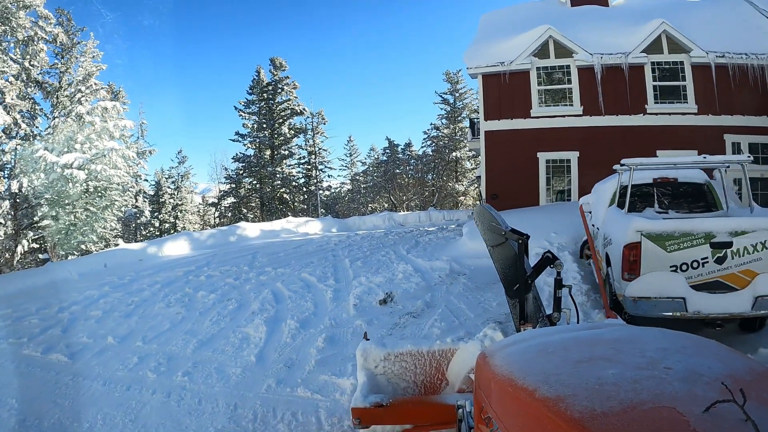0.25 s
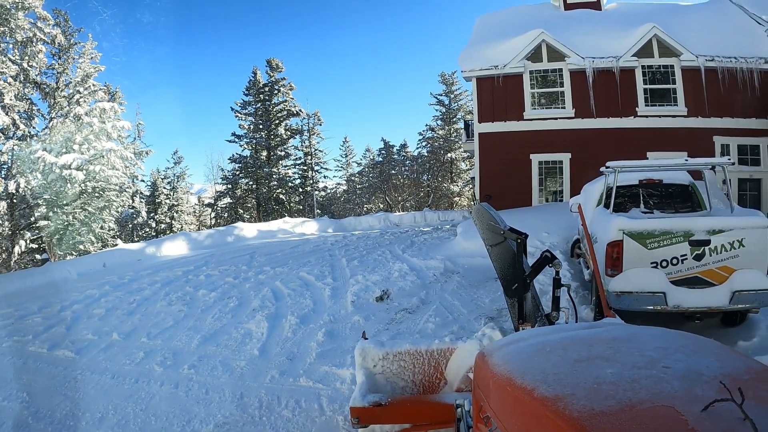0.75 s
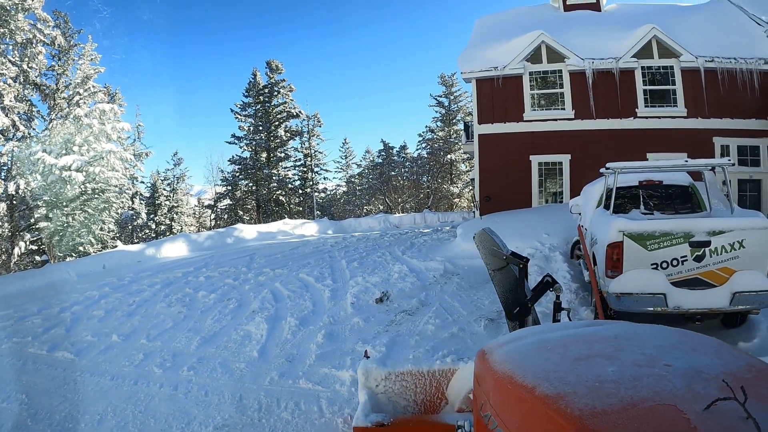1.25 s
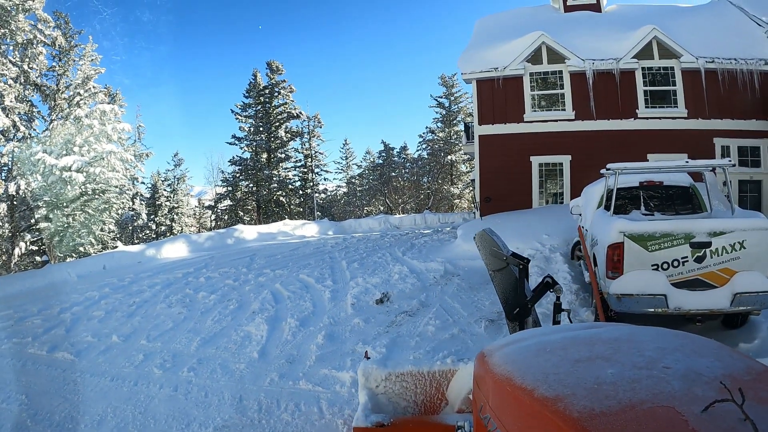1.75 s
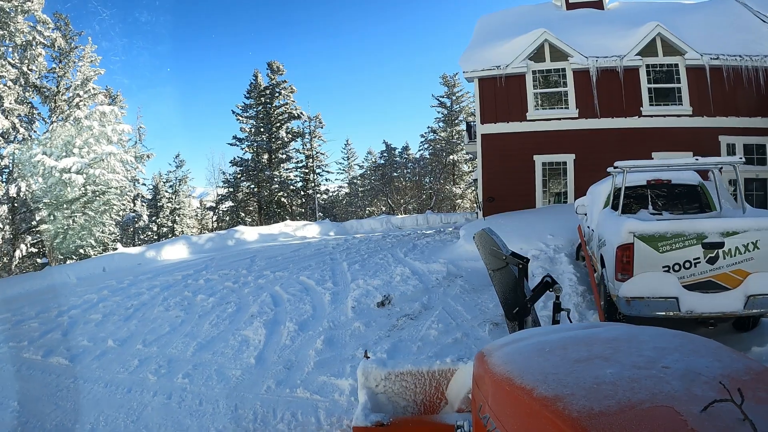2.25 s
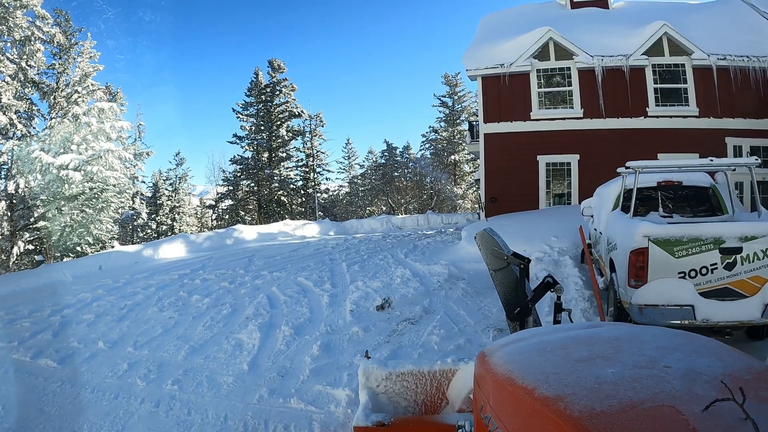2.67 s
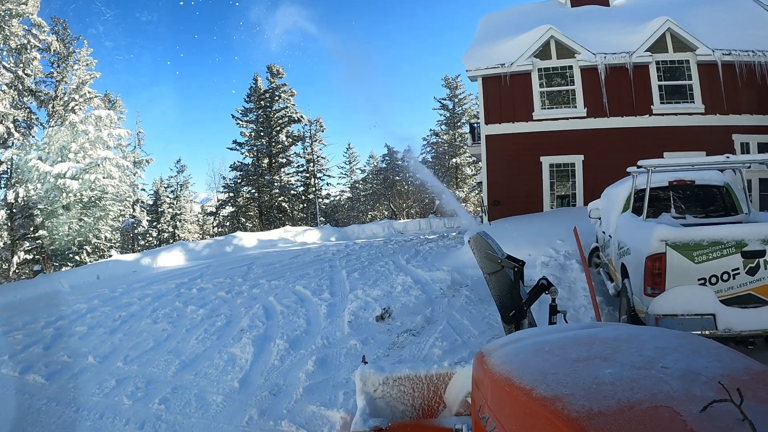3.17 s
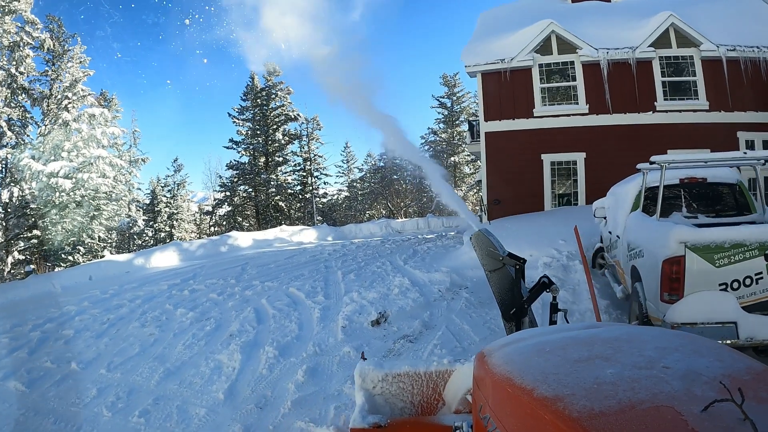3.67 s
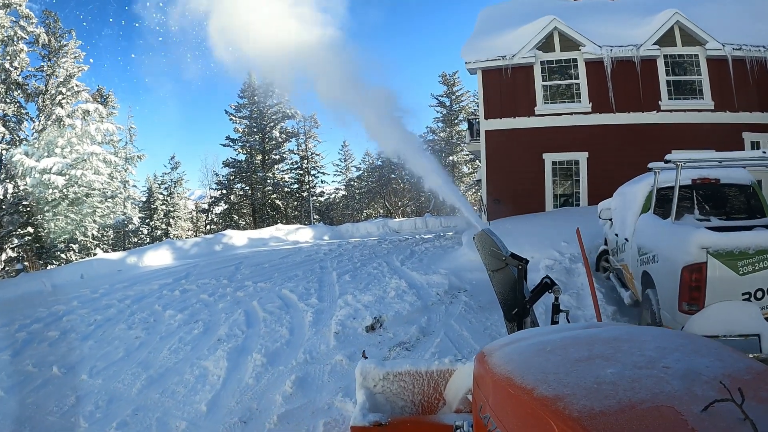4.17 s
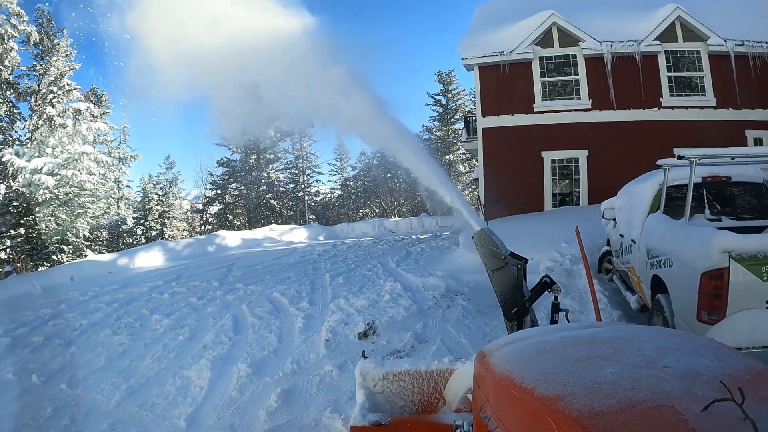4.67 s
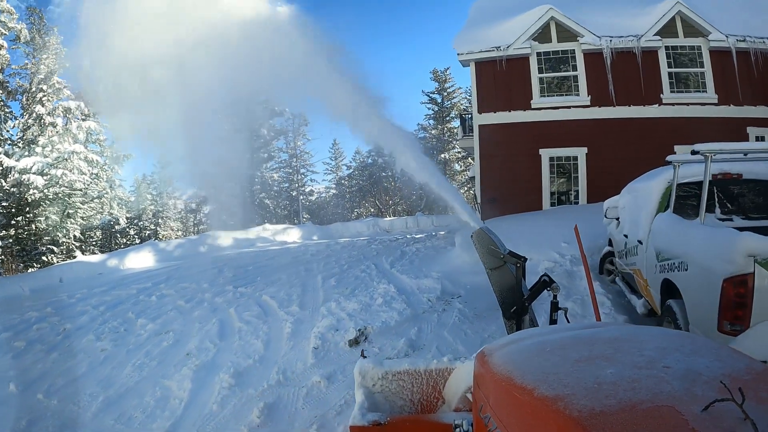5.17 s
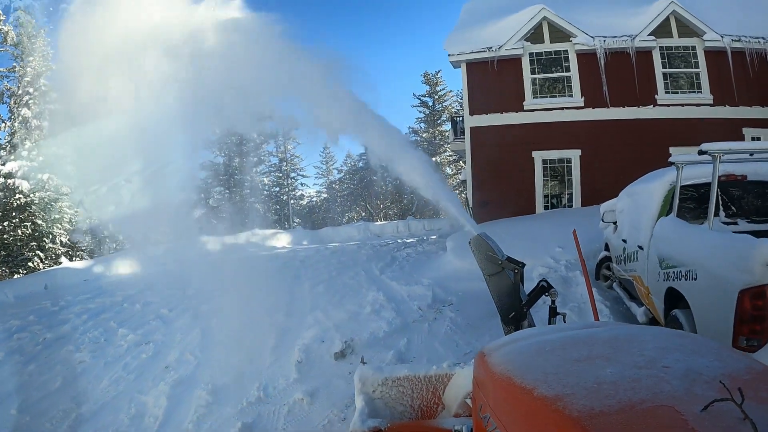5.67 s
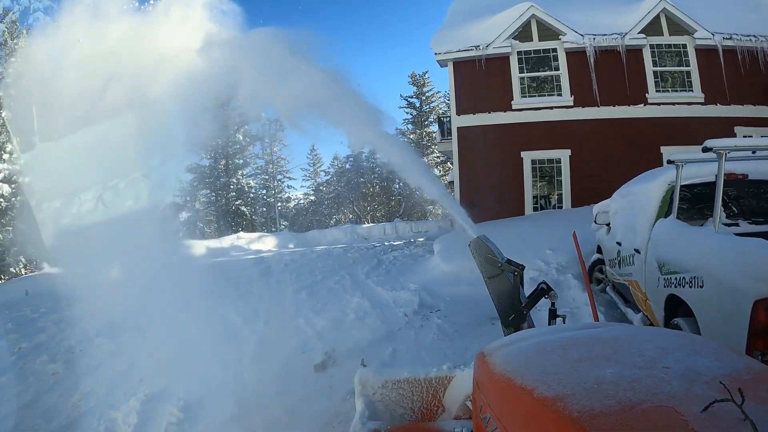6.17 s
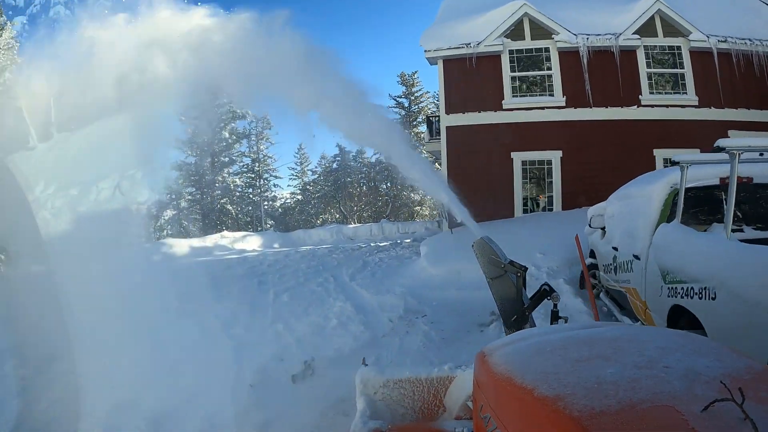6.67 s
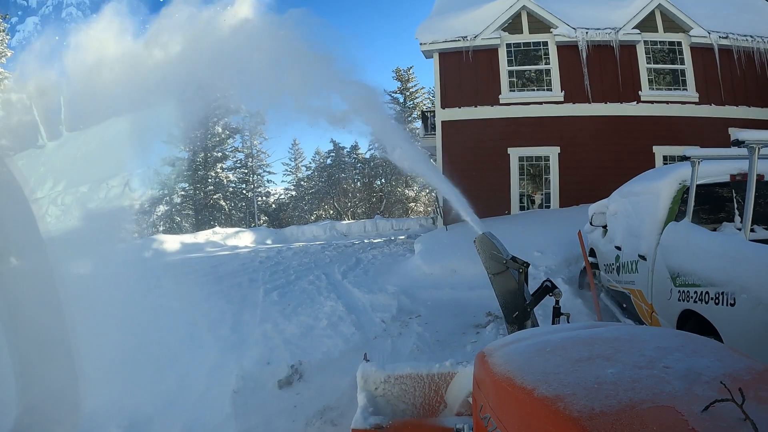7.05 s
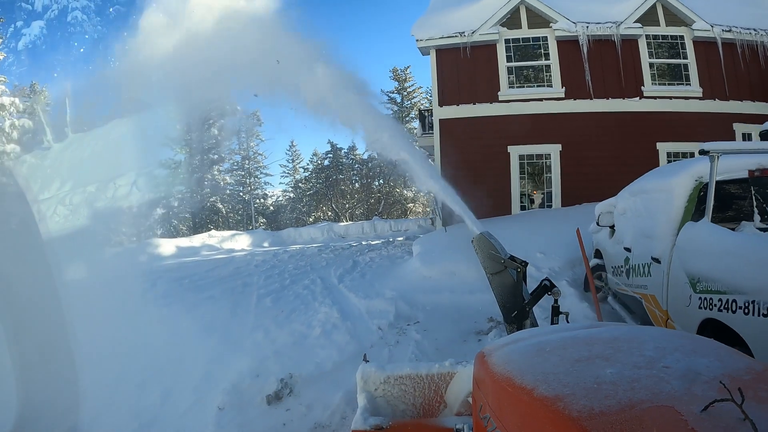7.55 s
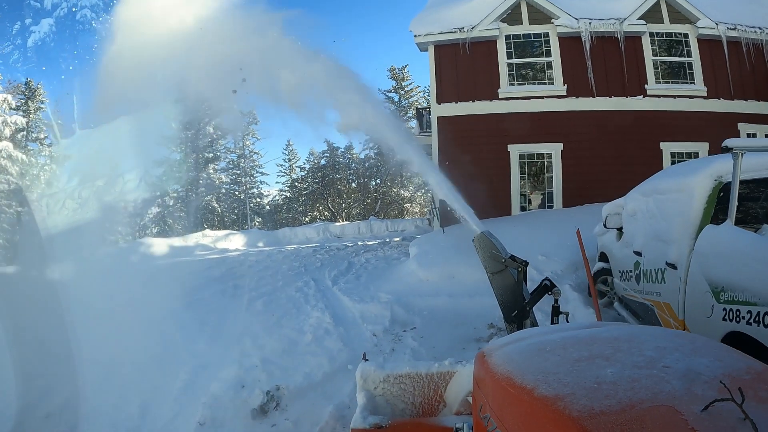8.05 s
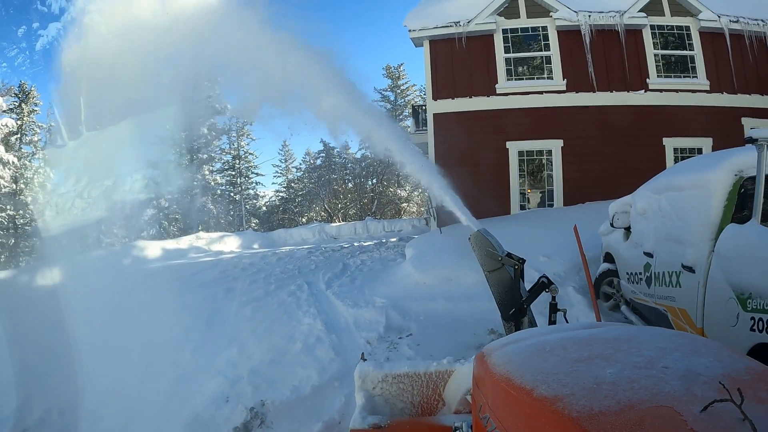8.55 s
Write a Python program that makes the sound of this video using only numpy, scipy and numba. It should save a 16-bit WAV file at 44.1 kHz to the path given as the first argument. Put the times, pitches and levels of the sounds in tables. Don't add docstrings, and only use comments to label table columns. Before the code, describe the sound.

A three-cylinder diesel tractor is heard from inside its closed cab as it works a snow blower. Throughout, a dense low roar booms around the cab, with rapid firing pulses, soft injector clatter, a steady mid-pitched gear whine and hydraulic singing. Deep frame shudder swells and fades in spells. Close lever clacks strike at about 0.35 and 0.5 seconds, with a fainter one near 0.9. From 1.25 to 1.5 a rattling cluster of clacks and hollow knocks mixes with dry, chirpy squeaks; the level dips briefly and recovers. Engine speed sags slightly toward 2.7, and the roar thickens around 3. A faint tick comes at 4.2. At 5.25 a heavy low thump lands with a clack, short squeak and tiny high ticks until 5.4. The engine then runs on, slightly fuller near 6.8, with a barely audible squeak at 8.5, and does not stop before the end at 8.8.

```python
import sys
import numpy as np
from scipy import signal
from scipy.fft import rfft, irfft, next_fast_len
from scipy.io import wavfile
from scipy.ndimage import uniform_filter1d
from numba import njit

SR = 44100
rng = np.random.default_rng(int(sys.argv[2]) if len(sys.argv) > 2 else 0)


def bounce(signal):
    frames = np.transpose(np.atleast_2d(signal))
    limited = np.clip(frames, -1, 1)
    pcm = np.round(limited * 32767).astype(np.int16)
    wavfile.write(sys.argv[1], SR, pcm)


def decibels_to_gain(level_db):
    exponent = np.asarray(level_db, float) / 20
    return 10 ** exponent


N = 388521


def level(x, db):
    return x * decibels_to_gain(db) / np.sqrt(np.mean(x ** 2))


def curves(table):
    time_s, *columns = np.transpose(table)
    return [np.interp(np.arange(N) / SR, time_s, column) for column in columns]


def at(table, hz):
    table_hz, value = np.transpose(table)
    return np.interp(np.log(np.maximum(hz, 1)), np.log(table_hz), value)


def peak(f, centre_hz, width_hz):
    return 1 / np.sqrt(1 + ((f - centre_hz ** 2 / np.maximum(f, 1)) / width_hz) ** 2)


def walk(rate_hz):
    hold = int(SR / rate_hz)
    steps = np.repeat(rng.standard_normal(N // hold + 1), hold)
    return 1.02 * uniform_filter1d(uniform_filter1d(steps, hold), hold)[:N]


# freq_hz, likeness [0-1]
LIKENESS = [(60, 0.97), (180, 1), (300, 0.95), (520, 0.85), (890, 0.62), (1520, 0.87), (2600, 0.03),
            (4000, 0.47), (8000, 0.64), (12000, 0.5)]
# freq_hz, left_minus_right_db
LEAN = [(30, -0.4), (140, -1), (320, 1), (740, 2.5), (1130, 4), (1710, 3), (2600, 1), (4000, -1.5),
        (8000, 3.5), (12000, 4)]


def noise(gain, gate=1):
    size = next_fast_len(N)
    f = np.arange(size // 2 + 1) * SR / size
    mid, side = rfft(gate * rng.standard_normal((2, N)), size)
    likeness = np.sqrt(np.clip(at(LIKENESS, f), 0, 1))
    mid = mid * np.sqrt(1 + likeness)
    side = side * np.sqrt(1 - likeness)
    lean = decibels_to_gain(at(LEAN, f) / 2)
    ports = np.array([(mid + side) * lean, (mid - side) / lean])
    return level(irfft(gain(f) * ports, size)[:, :N], 0)


def tone(hz, db, wander_db=1.7):
    lean_db = at(LEAN, np.mean(hz)) / 2
    apart = min(np.mean(hz) / 2500, 1)
    port_wander_db = apart * 1.3 * np.array([walk(2.9), walk(3.3)])
    ports = decibels_to_gain(lean_db * np.array([[1], [-1]]) + port_wander_db)
    phase = 2 * np.pi * (np.cumsum(hz * (1 + .0004 * walk(9))) / SR + rng.random())
    return np.sqrt(2) * decibels_to_gain(db + wander_db * walk(7)) * ports * np.sin(phase)


# start_s, length_s, pitch_hz, level_db
SHUDDER = [(-.1, 1.4, 27.53, -21.5), (1.222, 0.41, 24.63, -15.5), (1.804, 0.87, 26.31, -18.5),
           (2.85, 0.88, 25.68, -23.5), (3.853, 0.52, 27.5, -17), (4.501, 0.9, 26.3, -15),
           (5.45, 0.32, 26.1, -22.5), (6.002, 0.41, 26.16, -22.5), (6.902, 0.8, 26.2, -19.5),
           (7.8, 0.7, 27.44, -18), (8.657, .4, 27.3, -20.5)]
SHUDDER_FADE_S, SHUDDER_REST_DB, ROCK_DB, RUMBLE_DB = 0.13, -33, -24.5, -29.5


def frame():
    t = np.arange(N) / SR
    start_s, length_s, pitch_hz, level_db = np.transpose(SHUDDER)
    end_s = start_s + length_s
    inside_s = np.minimum(t - start_s[:, None], end_s[:, None] - t)
    swell = np.clip(inside_s / SHUDDER_FADE_S + .5, 0, 1)
    size = decibels_to_gain(SHUDDER_REST_DB) + decibels_to_gain(level_db) @ swell
    hz = uniform_filter1d(pitch_hz[np.searchsorted(start_s, t) - 1], size=SR // 8)
    rocking = decibels_to_gain(ROCK_DB) * noise(lambda f: peak(f, 22.5, 8.1) ** 2)
    rumble = decibels_to_gain(RUMBLE_DB) * noise(lambda f: peak(f, 40, 16) ** 2)
    return size * tone(hz, -2.3, wander_db=2.5) + rocking + rumble


# time_s, gear_mesh_hz
SPEED = [(0, 931), (1.9, 924), (2.7, 916.5), (3.2, 921), (3.6, 919), (4.8, 919), (5.6, 925), (5.9, 919.3),
         (6.8, 918.2), (7.6, 921), (8.81, 923)]
# time_s, effort_db
PUMP = [(0, -57), (.8, -53.5), (3, -51.5), (5.5, -55.5), (6, -50.5), (6.8, -49.5), (7.6, -51),
        (8.81, -51.5)]
PUMP_ORDERS = [3, 6, 9, 10, 11, 12]
PUMP_DB = [4.5, 4.5, 1.5, -3.5, -9.5, -13]
PUMP_PER_MESH = .282


def pump():
    pump_hz = curves(SPEED)[0] * PUMP_PER_MESH
    effort_db = curves(PUMP)[0]
    return sum(tone(k * pump_hz, effort_db + db) for k, db in zip(PUMP_ORDERS, PUMP_DB))


# start_s, length_s, pitch_hz, level_db
SQUEAKS = [(.43, .03, 7900, -58), (.98, .12, 7400, -59), (1.125, .09, 7300, -59), (1.255, .03, 2650, -34),
           (1.272, .045, 7800, -45), (1.275, .03, 5350, -44), (1.283, .035, 8150, -49),
           (1.30, .04, 6000, -46), (1.333, .09, 7800, -43), (1.345, .05, 5900, -49),
           (1.345, .045, 5300, -44), (1.35, .05, 8500, -52), (1.40, .03, 6000, -50),
           (5.205, .025, 14700, -51), (5.247, .04, 1920, -34), (5.285, .045, 14200, -57),
           (5.392, .03, 14150, -50), (8.465, .02, 7850, -60), (8.51, .04, 7800, -59)]


def squeaks():
    out = np.zeros((2, N + SR))
    t = np.arange(SR // 4) / SR
    for start_s, length_s, pitch_hz, level_db in SQUEAKS:
        swell = np.sin(np.pi * np.clip(t / length_s, 0, 1)) ** .7
        slip = uniform_filter1d(rng.standard_normal(len(t)), size=150)
        phase = 2 * np.pi * pitch_hz * np.cumsum(1 + .08 * slip) / SR
        i = int(start_s * SR)
        out[:, i:i + len(t)] += decibels_to_gain(level_db) * swell * np.sin(phase)
    return out[:, :N]


# start_s, level_db (rms at the blow), centre_hz, t60_s
CLACKS = [(.348, -23.5, 2530, .13), (.350, -23, 1090, 0.11), (.468, -33, 2720, 0.36), (.500, -20, 402, .12),
          (.501, -23, 2970, 0.16), (.926, -34, 3540, 0.13), (1.262, -28.5, 2620, 0.22),
          (1.305, -36, 2000, .18), (1.340, -26.5, 2100, .17), (1.385, -36, 2480, .23),
          (1.428, -36.5, 4490, 0.15), (5.204, -40, 7000, .1), (5.244, -26.5, 3100, 0.15),
          (5.246, -24, 1310, .16), (5.280, -50, 8800, .06), (5.300, -44, 8000, .06), (5.391, -35, 3500, .1),
          (6.168, -49, 4068, .06)]
# start_s, level_db, centre_hz, t60_s
KNOCKS = [(.352, -61, 10500, .1), (.510, -24, 1300, 0.11), (.926, -50, 9500, .088),
          (1.265, -51, 10530, .13), (1.272, -25.5, 1450, 0.25), (1.430, -56, 8500, .08),
          (1.385, -30, 1000, 0.26), (1.460, -22.5, 1000, 0.12), (5.256, -26.5, 1100, .12),
          (1.462, -27, 2020, .16), (5.228, -37, 6500, .05), (5.250, -14.5, 137, 0.49),
          (5.255, -15.5, 330, .22), (5.300, -19, 75, .28), (5.391, -38, 6800, 0.18),
          (5.391, -47, 12000, .12)]
# start_s, level_db, centre_hz, t60_s
TICKS = [
    (4.170, -48, 9450, .08),
    (5.205, -45, 14600, .15),
    (5.282, -58, 14500, .25),
    (5.372, -58, 14500, .12),
    (5.394, -45, 14400, .18),
]
# centre_hz, width_hz, level_db (over the plain burst)
LEVER = [(1094, 25, 9.5), (1600, 59, 5.5), (1930, 46, 0), (2210, 80, -1), (2750, 70, -12), (2740, 56, -2),
         (3720, 64, -20), (4870, 120, -9)]
CLACK_WIDTH, KNOCK_WIDTH, TICK_WIDTH = 1.2, 0.4, .1
BURST_TOP_HZ = 13400


def levers():
    out = np.zeros((2, N + SR))
    t = np.arange(SR // 4) / SR
    f = np.arange(len(t) // 2 + 1) * SR / len(t)
    ring = 1 + sum(decibels_to_gain(db + 1.0) * peak(f, hz, width_hz) ** 2 for hz, width_hz, db in LEVER)
    for blows, width in [(CLACKS, CLACK_WIDTH), (KNOCKS, KNOCK_WIDTH), (TICKS, TICK_WIDTH)]:
        for start_s, level_db, centre_hz, t60_s in blows:
            pan_db = .7 * at(LEAN, centre_hz)
            mid, side, chatter = rng.standard_normal((3, len(t)))
            audible = (f < BURST_TOP_HZ) | (centre_hz > BURST_TOP_HZ)
            colour = ring * peak(f, centre_hz, max(width * centre_hz, 40)) ** 3 * audible
            burst = irfft(rfft([mid + 0.32 * side, mid - 0.37 * side]) * colour, len(t))
            chatter = decibels_to_gain(21 * uniform_filter1d(chatter, size=130))
            decay = np.exp(-np.log(1000) * t / max(t60_s, .01))
            shape = np.minimum(t / .003, 1) * decay * chatter
            ports = decibels_to_gain(np.array([[pan_db], [-pan_db]]) / 2)
            i = int(start_s * SR)
            out[:, i:i + len(t)] += level(burst, level_db) * shape * ports
    return out[:, :N]


# freq_hz, density_db (per Hz)
ROAR = [(8.8, -24), (15, 6), (37, -9), (54, -7.5), (135, -9), (176, -11.5), (219, -8), (256, -27),
        (293, -9), (373, -15.5), (408, -12), (436, -14), (867, -20.5), (947, -16.5), (3000, -34),
        (3900, -72), (6600, -120)]
# freq_hz, density_db (per Hz)
CLATTER = [(1400, -12), (2000, -5.5), (3200, -8.5), (4300, -9.5), (5500, -15), (7700, -20), (8300, -25.5),
           (11400, -28), (11700, -30.5), (13300, -34), (14000, -45), (15800, -52)]
CYCLE_SAMPLES = 1947


def valves(turns, db):
    f = np.arange(CYCLE_SAMPLES // 2 + 1) * SR / CYCLE_SAMPLES
    colour = decibels_to_gain(at(ROAR, f) - 2.0) * (f > 420) + decibels_to_gain(at(CLATTER, f) - 28.0)
    impacts = rng.standard_normal((2, CYCLE_SAMPLES)) ** 3
    mid, side = irfft(rfft(impacts) * colour, CYCLE_SAMPLES)
    place = turns / 3 * CYCLE_SAMPLES
    grid = np.arange(CYCLE_SAMPLES)
    ports = [np.interp(place, grid, mid + lean * side, period=CYCLE_SAMPLES) for lean in (.45, -.25)]
    return level(np.array(ports), 0) * decibels_to_gain(db + 2.0 * walk(2.83))


# time_s, roar_db
LOAD = [(0, -29), (1.3, -27.5), (1.7, -29.5), (2.5, -28.5), (3.0, -27), (4.8, -27.5), (5.9, -27.5),
        (6.75, -26.5), (7.75, -27.5), (8.24, -27.5), (8.81, -28.5)]
FIRING_ORDERS = [2, 4, 4.25, 5, 6, 8, 9, 12, 18, 19, 20, 22, 24, 25.5, 30, 66, 78]
FIRING_DB = [-5.5, -10.5, -9, -19, -4.5, -11.5, -21.5, -30.5, -20.5, -21.5, -20, -21.5, -19.5, -23.5, -28.5,
             -43, -40]
# centre_hz, width_hz, level_db (over the roar)
CAB = [(63.2, 18, -7), (81.7, 14, -14.5), (106, 29, -2), (132, 24, -4), (161.6, 22, -6), (190.5, 6.9, -7.5),
       (310.8, 41, -7), (513, 96, -8.5), (701, 50, -16), (1050, 40, -19.5), (1390, 70, -17.5)]
MESH_PER_FIRING = 13.55
CLATTER_DB, GEAR_DB, BOOM_DB = -14.5, -11, 7.5
BOOM_HZ, BOOM_WIDTH_HZ, BOOM_PER_LOAD = 220.6, 29.9, 0.85


def diesel():
    mesh_hz, roar_db = curves(SPEED)[0], curves(LOAD)[0]
    firing_hz = mesh_hz / MESH_PER_FIRING
    lines = sum(tone(k * firing_hz, roar_db + db) for k, db in zip(FIRING_ORDERS, FIRING_DB))
    gears = tone(mesh_hz, roar_db + GEAR_DB, wander_db=1.5) + tone(mesh_hz / 2, roar_db - 10.5)
    turns = np.cumsum(firing_hz) / SR
    strength = decibels_to_gain(4.5 * rng.standard_normal(int(turns[-1]) + 1))
    knock = strength[turns.astype(int)] * np.exp(-(turns % 1) / 0.4)
    roar = decibels_to_gain(2.5) * noise(lambda f: decibels_to_gain(at(ROAR, f)), 1 + 0.15 * knock)
    panels = sum(decibels_to_gain(db + 1.1 * walk(6.7)) * noise(lambda f: peak(f, hz, width_hz) ** 2)
                 for hz, width_hz, db in CAB)
    boom_db = BOOM_DB + BOOM_PER_LOAD * (roar_db - roar_db.mean()) + 1.94 * walk(5)
    boom = decibels_to_gain(boom_db) * noise(lambda f: peak(f, BOOM_HZ, BOOM_WIDTH_HZ) ** 2)
    clatter = decibels_to_gain(CLATTER_DB) * noise(lambda f: decibels_to_gain(at(CLATTER, f)), 1 + 0.23 * knock)
    broadband = decibels_to_gain(roar_db) * (roar + panels + boom + clatter)
    return lines + gears + broadband + valves(turns, roar_db - 11.5)


def scene():
    return frame() + pump() + squeaks() + levers() + diesel()


# start_s, depth_db
DUCKS = [
    (.53, -1.5),
    (1.48, -3),
    (5.28, -1.5),
]
DUCK_FALL_S, DUCK_RECOVER_S = 0.036, 0.56


def ducking():
    start_s, depth_db = np.transpose(DUCKS)
    since_s = np.maximum(np.arange(N) / SR - start_s[:, None], 0)
    fall = 1 - np.exp(-since_s / DUCK_FALL_S)
    recover = np.exp(-(since_s / DUCK_RECOVER_S) ** 2)
    return decibels_to_gain(depth_db @ (fall * recover))


@njit
def follow(x, attack, release):
    e, y = .2, np.empty(len(x))
    for i in range(len(x)):
        e += (x[i] - e) * (attack if x[i] > e else release)
        y[i] = e
    return y


def low_pass(x):
    return signal.sosfilt(signal.butter(12, 15550, fs=SR, output="sos"), x)


def record(dry):
    dry = dry * ducking()
    envelope = follow(np.abs(dry).max(axis=0), 1 / (.002 * SR), 1 / (.06 * SR))
    mix = dry * np.minimum(1, decibels_to_gain(-9) / envelope) ** .7
    return low_pass(mix)


dry = scene()
out = record(dry)
bounce(out)
```